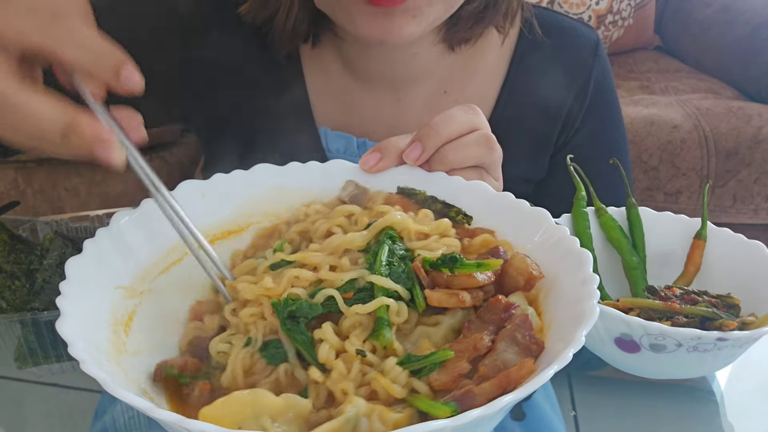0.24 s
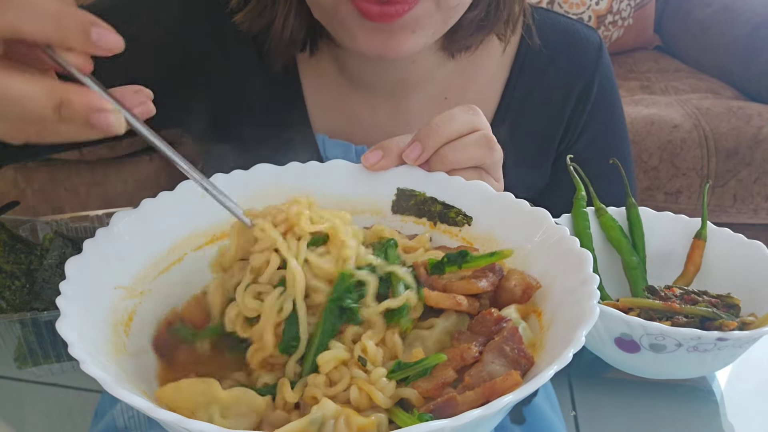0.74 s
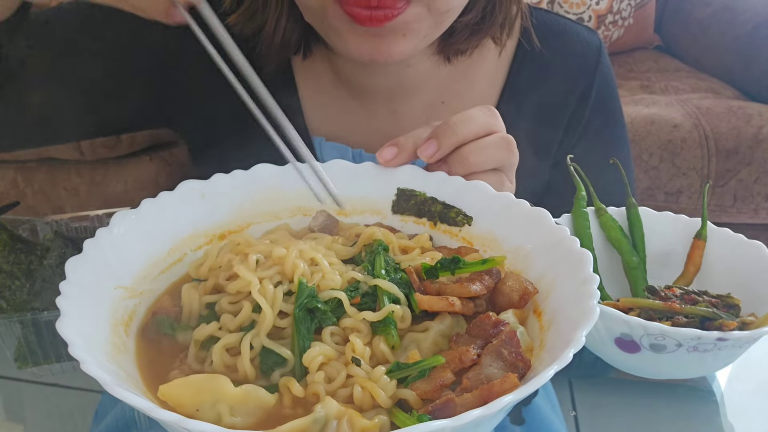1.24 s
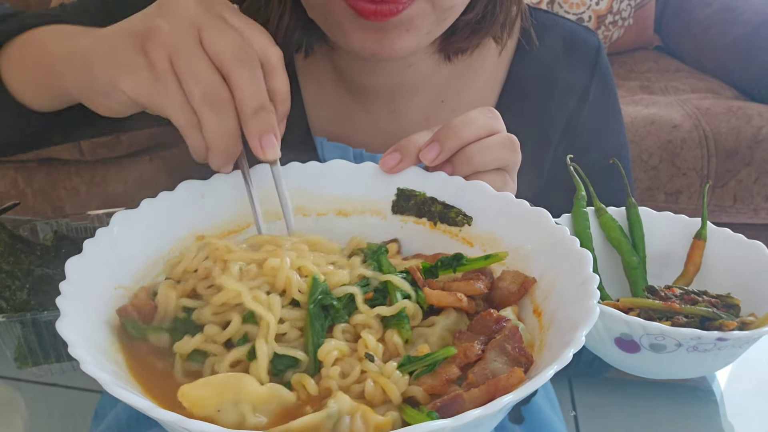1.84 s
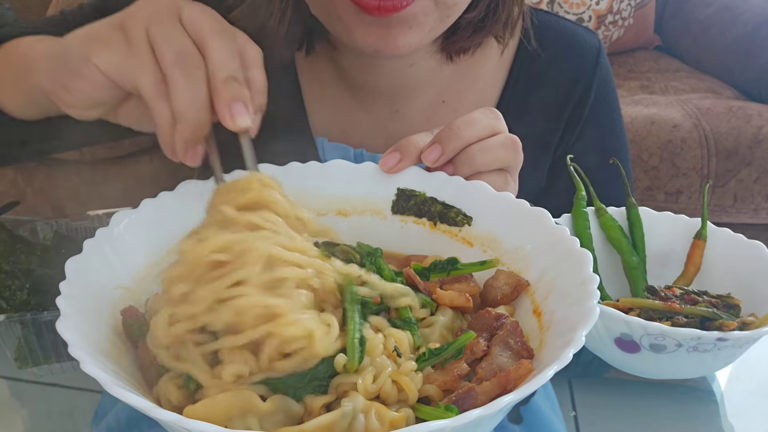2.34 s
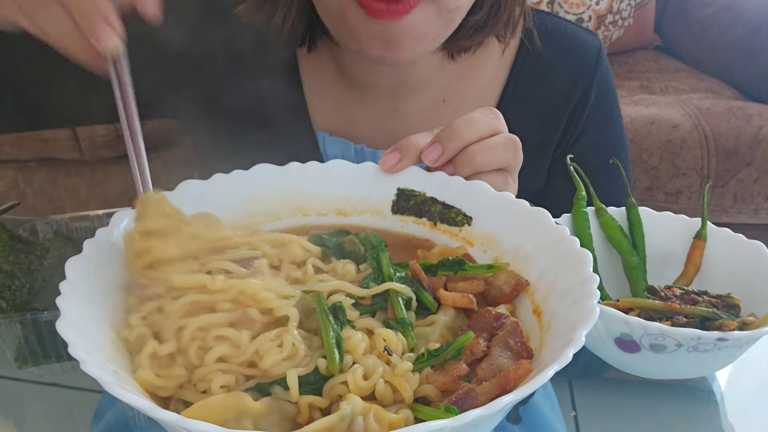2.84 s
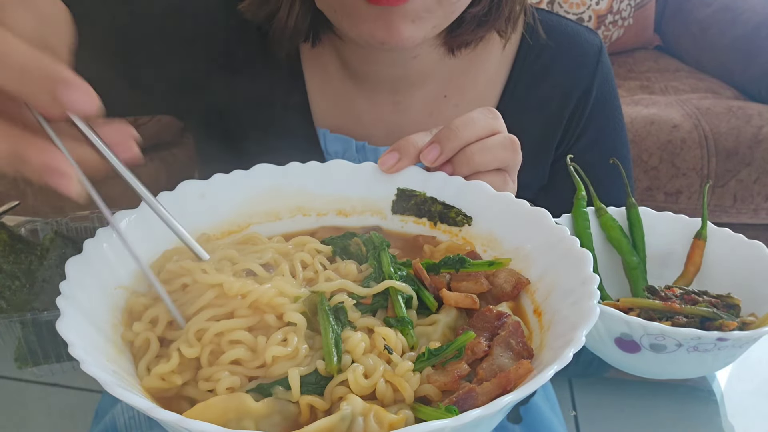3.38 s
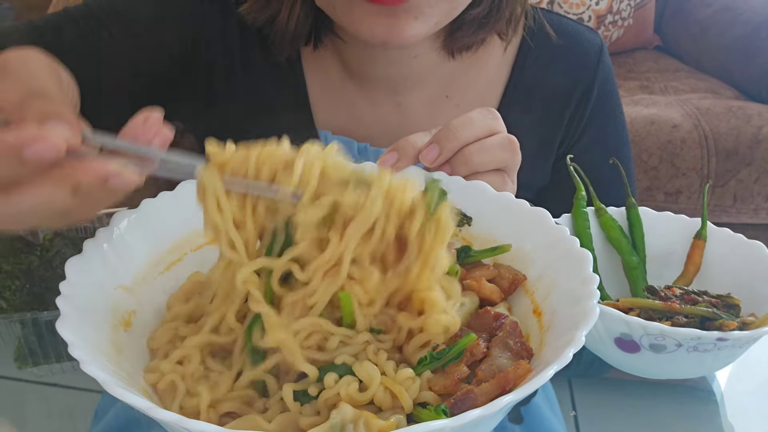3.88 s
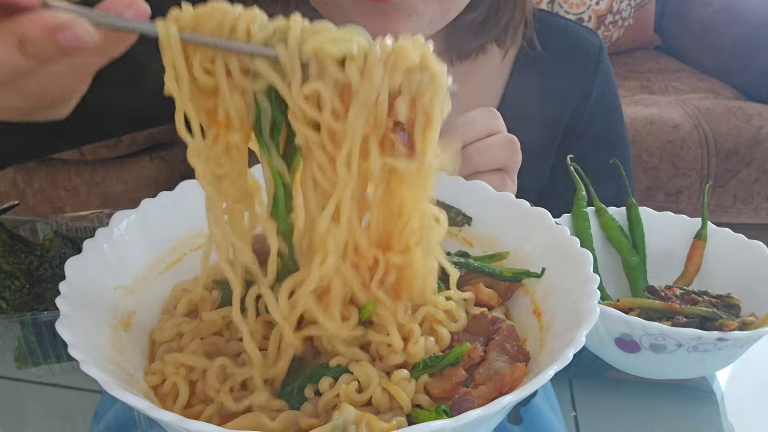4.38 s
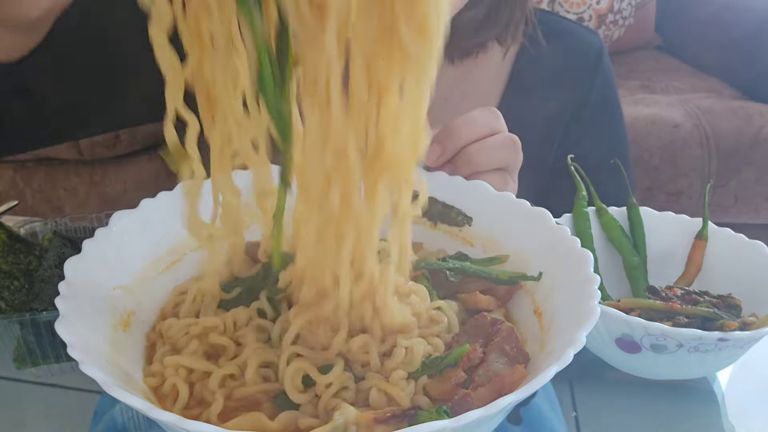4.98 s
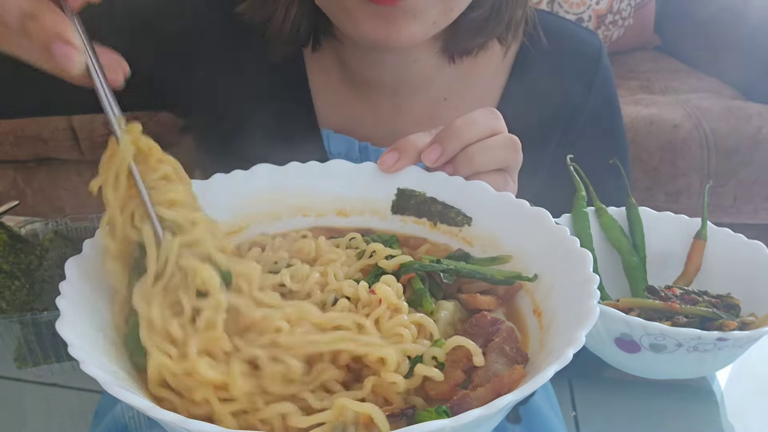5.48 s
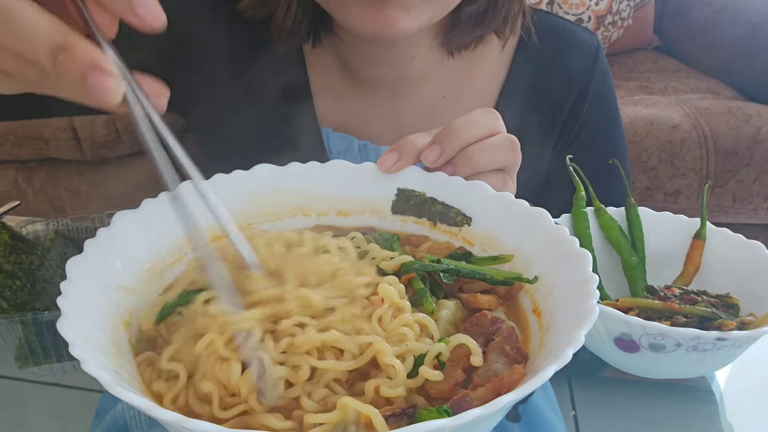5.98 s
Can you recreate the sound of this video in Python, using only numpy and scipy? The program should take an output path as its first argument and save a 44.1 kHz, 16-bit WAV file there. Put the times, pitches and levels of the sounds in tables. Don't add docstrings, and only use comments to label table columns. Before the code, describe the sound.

Steel chopsticks clink and scrape on a glazed bowl while wet noodles crackle and pop softly over a low motor hum and faint hiss.

```python
import sys
import numpy as np
from scipy import signal
from scipy.fft import rfft, irfft, next_fast_len
from scipy.io import wavfile
from scipy.ndimage import uniform_filter1d

SR = 44100
rng = np.random.default_rng(int(sys.argv[2]) if len(sys.argv) > 2 else 0)


def boost(x):
    u = np.asarray(x, float) / 20
    return 10 ** u


def wav_out(sig):
    wavfile.write(sys.argv[1], SR, np.round(np.clip(np.atleast_2d(sig).T, -1, 1) * 32767).astype(np.int16))


N = 274302

# ring_time_share (0-1), crack_db, crack_s, thud_db, slide_top_hz
SPOTS = [(0.63, -3, 0.0097, -11, 5800), (0.59, 3, 0.0044, -16.5, 12000), (0.66, -4, .01, -34, 5700),
         (0.37, 1.5, 0.013, -5.5, 7300), (0.66, -6.5, 0.0053, -19, 9400), (0.65, -7, .01, -28, 9500),
         (0.34, -21, .01, -36, 10400)]


def shape(points, hz):
    p = np.array(points)
    return np.interp(np.log(hz), np.log(p[:, 0]), p[:, 1])


def unit(x):
    return x / np.sqrt(np.mean(x ** 2) + 1e-20)


def convolve(x, response):
    return signal.fftconvolve(np.atleast_2d(x), response, axes=1)[:, :N]


def butter(x, order, hz, kind="low"):
    return signal.sosfilt(signal.butter(order, hz, kind, fs=SR, output="sos"), x)


def add(track, part, at):
    part = part[:, :N - at]
    track[:, at:at + part.shape[1]] += part


def flutter(rate, depth_db):
    count = int(N / SR * 60) + 2
    slow = uniform_filter1d(rng.standard_normal(count), max(1, round(60 / rate)))
    return boost(depth_db * np.interp(np.linspace(0, count - 1, N), np.arange(count), unit(slow)))


def airborne(gain_at):
    # pitch_hz, likeness (0-1)
    likeness = [(60, 0.96), (250, 0.99), (500, 0.5), (800, 0.18), (1200, 0.81), (2000, 0.4), (4000, 0.01),
                (15000, 0)]
    # pitch_hz, left_minus_right_db
    lean_curve = [(60, -1), (110, -2), (200, -2), (380, -2.5), (700, -5.5), (1290, -3.5), (2380, -3),
                  (4400, -2.5), (8120, -6.5), (15000, 16)]
    port_lag_s = 0.00019
    size = next_fast_len(N)
    hz = np.maximum(np.arange(size // 2 + 1) * SR / size, 1)
    mid, side = rfft(rng.standard_normal((2, size))) * gain_at(hz)
    alike = np.clip(shape(likeness, hz), 0, 1)
    lean = boost(shape(lean_curve, hz) / 2)
    shared, own = np.sqrt(1 + alike) * mid, np.sqrt(1 - alike) * side
    left = (shared + own) * lean * np.exp(-2j * np.pi * hz * port_lag_s)
    right = (shared - own) / lean
    pair = irfft(np.array([left, right]), size)[:, :N]
    return pair / np.sqrt(np.mean(pair.mean(axis=0) ** 2))


def room_noise(deep_db, drone_db, hiss_db):
    # pitch_hz, density_db (dB per Hz)
    deep_colour = [(25, -55), (33, -16), (42, -15), (52, -2.5), (64, 6), (80, -2), (100, -1)]
    # pitch_hz, density_db (dB per Hz)
    drone_colour = [(60, -17), (98, -6.5), (125, -7.5), (160, -8.5), (200, -0.5), (255, -1), (320, -4.5),
                    (400, -11), (520, -11), (720, -22), (1100, -12.5), (1450, -23), (1930, -21),
                    (2600, -30)]
    # pitch_hz, density_db (dB per Hz)
    hiss_colour = [(1760, -12.5), (3000, 4), (4380, -3.5), (8140, -9), (10400, -9), (15100, -12),
                   (16000, -15), (16500, -32)]
    # pitch_hz, width_hz, over_drone_db
    hum_lines = [(51.6, 16, -3.5), (95.52, 1.34, -7.5), (261.1, 4.3, -10), (379.6, 3, -15)]
    fall_db_per_octave, top_hz = -39, drone_colour[-1][0]

    def drone_gain(hz):
        fall_db = fall_db_per_octave * np.log2(np.maximum(hz / top_hz, 1))
        return boost(shape(drone_colour, hz) + fall_db) * (hz > 40)

    deep = airborne(lambda hz: boost(shape(deep_colour, hz)) * (hz > 15) * (hz < 130))
    drone = airborne(drone_gain)
    for line_hz, width, line_db in hum_lines:
        drone = drone + boost(line_db) * airborne(lambda hz: 1 / (1 + (2 * (hz - line_hz) / width) ** 2))
    hiss = airborne(lambda hz: boost(shape(hiss_colour, hz)))
    deep = boost(deep_db) * flutter(6, 0.52) * deep
    drone = boost(drone_db) * flutter(12, 0.88) * drone
    return deep + drone + boost(hiss_db) * hiss


def room_tail(x):
    t60_s, tail_db = 0.42, -3.5
    t = np.arange(SR // 2) / SR
    noise = rng.standard_normal((2, len(t))) * np.clip(t / 0.0045, 0, 1)
    dull = signal.lfilter([.4], [1, -.6], noise)
    bright = noise - dull
    response = dull * boost(-60 * t / t60_s) + bright * boost(-60 * t / (.7 * t60_s))
    return boost(tail_db) * convolve(x.mean(axis=0), response / np.sqrt(np.sum(response ** 2) / 2))


def pop(peak_db, hz, pan_db, cycles, glide, snap_db):
    turn = np.arange(160) * hz / SR
    swell = (turn / cycles) * np.exp(1 - turn / cycles)
    wave = swell * np.sin(2 * np.pi * turn * (1 + glide * turn))
    wave[1:4] += boost(snap_db) * np.array([.5, -1, .5])
    return boost(peak_db + np.array([[pan_db / 2], [-pan_db / 2]])) * wave


def clear_pops(gain_db):
    # start_s, peak_db, pitch_hz
    stir_pops = [(.0303, -56, 9600), (.088, -51, 7000), (.1093, -44, 8460), (.132, -44.5, 4360),
                 (.435, -58, 9700), (.541, -51, 15200), (.5498, -48.5, 9300), (.6047, -48.5, 9700),
                 (.6473, -49, 7500), (.6882, -52, 13700), (.7262, -50, 15600), (.791, -45, 5600),
                 (.8591, -50, 9000), (.8802, -50, 4730), (1.0444, -53, 7930), (1.8407, -45.5, 5200),
                 (1.906, -48, 8500), (2.085, -43, 14700), (2.3413, -51, 8500), (2.6424, -52.5, 7750)]
    # start_s, peak_db, pitch_hz
    lift_pops = [(3.645, -46, 11900), (3.661, -42.5, 8160), (3.724, -44, 10600), (3.7369, -40.5, 9500),
                 (3.8152, -47, 11470), (3.832, -39, 8150), (3.876, -44.5, 7350), (3.9343, -45.5, 8250),
                 (4.0067, -40, 13000), (4.0225, -44, 12400), (4.1174, -50, 11750), (4.133, -38, 9670),
                 (4.159, -41, 15600), (4.4557, -46.5, 8500), (4.4896, -37, 8000), (4.673, -37.5, 12800),
                 (4.686, -57, 7650), (5.1666, -43, 7750), (5.2089, -43.5, 9500), (5.224, -41, 5940),
                 (5.239, -44, 8600), (5.271, -34.5, 7800), (5.326, -42, 13700), (5.3607, -42, 12200),
                 (5.379, -47, 10500), (5.511, -40, 14000), (5.7053, -53.5, 8550), (5.724, -47, 10400),
                 (5.7678, -46, 13800), (5.796, -48, 8800)]
    # start_s, peak_db, pitch_hz
    drain_pops = [(2.7868, -49, 2780), (2.8647, -49, 3200), (2.946, -46, 4900), (2.9544, -49, 9000),
                  (3.011, -52, 11000), (3.0177, -50, 3200), (3.043, -43, 5200), (3.1852, -48, 4000),
                  (3.231, -47, 3460), (3.244, -48, 4540), (3.253, -47, 5200), (3.2907, -46.5, 5500),
                  (3.35, -41, 12500), (3.4062, -48, 11100), (3.5095, -46, 4660), (3.525, -47, 5500),
                  (3.5543, -47, 5430), (5.0597, -49.5, 4350), (5.9198, -36.5, 5400), (5.976, -53, 5640)]
    # start_s, peak_db, pitch_hz
    fine_pops = [(2.7684, -58, 6200), (2.8164, -60, 6000), (2.8545, -53, 6500), (2.9894, -53, 5700),
                 (3.0614, -54, 5020), (3.0824, -55, 5800), (3.1765, -56, 8500), (3.2814, -48, 7000),
                 (3.5045, -53, 8500), (3.5084, -50, 14000), (3.5704, -54, 11000), (3.5814, -54, 8500),
                 (3.5854, -50, 12600), (3.588, -54, 6000), (5.0325, -51, 4670), (5.1724, -49, 6500),
                 (5.1955, -54, 6500), (5.239, -48, 5270), (5.304, -46, 8500), (5.369, -48, 4470),
                 (5.4465, -52, 7200), (5.4806, -56, 6800), (5.5344, -56, 7500), (5.557, -55, 7000),
                 (5.7624, -58, 7300), (5.7834, -52, 13000), (5.895, -54, 4500), (5.9284, -53, 12000),
                 (5.958, -51, 10000), (5.9634, -52.5, 5420), (5.972, -45, 13000), (6.0048, -50, 13000),
                 (4.341, -44, 1010), (5.201, -48, 905), (5.8945, -51, 1100), (5.925, -57, 5200)]
    # start_s, peak_db
    ticks = [(0.515, -49), (.887, -52), (.9126, -52), (2.06, -55), (2.1414, -51), (2.1617, -58),
             (2.4658, -53), (3.3555, -44), (3.6037, -51), (3.6824, -56), (3.707, -54), (3.8005, -45),
             (3.827, -46), (3.8535, -51), (3.8915, -49), (3.9343, -43), (3.952, -47), (3.9649, -45),
             (3.9894, -48), (4.0989, -53), (4.1224, -49), (4.167, -50), (4.1873, -48), (4.3183, -53),
             (4.4658, -50), (4.5836, -53), (4.6048, -50), (4.6203, -45), (4.6534, -53), (4.6894, -44),
             (4.7044, -49), (4.8273, -53), (4.9192, -58), (4.975, -51), (5.1496, -49), (5.2633, -52),
             (5.3028, -51), (5.34, -53), (5.4565, -46), (5.4959, -52)]
    tick_rows = [(*row, 13860) for row in ticks]
    kinds = [(stir_pops, 1.28), (lift_pops, 1.28), (drain_pops, 1.65), (fine_pops, 1.3), (tick_rows, 1.28)]
    rows = []
    for pops, cycles in kinds:
        for s, peak_db, hz in pops:
            pan_db = -2.5 + 3 * np.log2(hz / 5000) + 6.5 * rng.standard_normal()
            rows.append([s, peak_db - gain_db[int(s * SR)], hz, pan_db, cycles])
    return rows


def crackle(rustle_db):
    per_s, crackle_db = 650, 7
    draw = rng.random((9000, 5))
    times = np.cumsum(-np.log(1 - draw[:, 0])) / per_s
    rows = []
    for s, (_, size, pitch, side, cycles) in zip(times[times < N / SR], draw):
        moving_db = 2.34 * (rustle_db[int(s * SR)] + 80.5) - 89.0
        level_db = moving_db + crackle_db + min(-3.5 * np.log(1 - size), 6.0)
        low, high = (2960, 8000) if 2.82 < s < 3.33 else (4000, 15200)   # Hz, draining or not
        hz = low * (high / low) ** pitch ** .7
        rows.append([s, level_db, hz, 8 * (side - .3), 0.47 + 2.6 * cycles])
    return rows


def noodles(rustle_db, gain_db):
    out = np.zeros((2, N + 200))
    for s, peak_db, hz, pan_db, cycles in clear_pops(gain_db) + crackle(rustle_db):
        lag = max(0, round(-pan_db * 1e-5 * SR))
        snap_db = 1.5 + 12 * min(np.log2(hz / 8000), 0)
        wave = pop(peak_db, hz, pan_db, cycles, 0.0041, snap_db)
        at = int(s * SR)
        out[0, at + lag:at + lag + 160] += wave[0]
        out[1, at:at + 160] += wave[1]
    return out[:, :N]


def contact_noise(spot, t):
    # pitch_hz, t60_s, level_db
    thud_modes = [(241.3, 0.14, 9.5), (372, 0.18, 2)]
    shimmer_db = [-16, -18, -26, -28, -16, -26, -26]
    _, crack_db, crack_s, thud_db, _ = SPOTS[spot]
    crack_fall = boost(crack_db - 60 * t / crack_s) + boost(crack_db + 4.5 - 60 * t / 0.022)
    crack = rng.standard_normal((2, len(t))) * crack_fall
    shimmer = rng.standard_normal((2, len(t))) * boost(shimmer_db[spot] - 60 * t / 0.2)
    crack = crack + butter(shimmer, 2, 8500, "high")
    thud = sum(boost(thud_db + db - 60 * t / t60_s) * np.sin(2 * np.pi * low_hz * t)
               for low_hz, t60_s, db in thud_modes)
    return crack, thud


def ringing(spot):
    # pitch_hz, t60_s
    bowl = [(452, .15), (1095, .055), (1968, .095), (2288, .09), (2643, .11), (2915, .08), (3340, .09),
            (3525, .06), (3755, .12), (4700, .07), (4950, .075), (5385, .07), (5560, .07), (6140, .05)]
    # pitch_hz, t60_s
    sticks = [(6288, .075), (6810, .05), (7010, .045), (7420, .06), (7740, .125), (7980, .055), (9350, .05),
              (10420, .035), (10860, .05), (11670, .035), (12640, .045), (13690, .03), (14580, .045),
              (15280, .04)]
    # pitch_hz, t60_s
    glass = [(930, .12), (1420, .09), (1620, .09), (2130, .08), (3850, .07), (4180, .06), (5100, .06),
             (8330, .06)]
    bowl_reach = [(-15, -4, -3.5, -0.5, -28, -24, -4.5, -12, -9, -6, -7, -3.5, -5.5, -41),
                  (-15.5, -31.5, -8.5, -9.5, -13.5, -43, -30, -45.5, -19, -31.5, -16.5, -19.5, -32, -11.5),
                  (-16, -18, -2, -10, -20, -15, -3, -3, -12, -7, -19, -16, -20, -21),
                  (-42, -4, -5, 0, -37, -30, -8, -10, -5, -14, 4.5, -8, -0.5, 0),
                  (-13, -11, -16.5, -40, -18, -20, -46, -31, -11, -38, 3.5, -28, -36, -27),
                  (-19, -15, -12, -4, -18, -25, -22, 3, -8, -16, -18, -10, -20, -6),
                  (-21, -4, -0.5, 3.5, -12, -22, -15, 0, -12, -20, -13, -13, -20, -25)]
    stick_reach = [(-13, -5, 5, 2, -12, 2, -23, -33, -27, -43, -1, -4, -1, -17),
                   (3.5, -34, -23, -30.5, 4, -1.5, -1, -19, 0, -6, -5, 11, -6.5, -8),
                   (-26, -11, -21, -15, -20, -20, -29, -24, -24, -29, -21, -13, -25, -31),
                   (-16, 5, -3, -15.5, -1, 3, -3, 3, -11, -12, 0, -12, -8, -10),
                   (6, -1, -12, -15, -23, -5.5, -10, -6, 0, 3.5, -10, -1, -5.5, -9),
                   (-18, -13, -21, 0.5, -11, -20, -29, -24, -24, -29, -21, -18, -25, -31),
                   (-26, -16, -21, -12, -17, -20, -29, -24, -24, -29, -21, -18, -25, -31)]
    glass_reach = [(-24, -28, -27, -3.5, -5.5, -20, -22, -12), (-16, -27.5, -20.5, -13, -9, -28, -24.5, 1),
                   (-30, -30, -30, -11, -17, -12, -23, -25), (-15, -20, -11, -2, -1, -22, -17, -1),
                   (-23, -22, -20, -30, -13, -34, -25, -4), (-28, -24, -28, -18, -1, -8, -18, -20),
                   (-23, -26, -28, -2, -12, -17, -6, -25)]
    rubbed = [0, 1, 3, 4]
    rub_bowl = [(1, -8, 0.5, -1, 5, 11, -4, -2, -2, -2, 0, 1, -3, 4),
                (0, 1, 0, -11, 5.1, 4, -3, -3, 1, -3.5, 3, 12, 20.5, 15),
                (-3, 0, 5, 1, 6, 6, 1, 7, -3, 3, -4.5, -5, 1, -4),
                (-4, -6, 6, 6, 16, -3, -3, -3, 8, -3, -19, -3, -6, -3)]
    rub_stick = [(-8, -10, -10, -9, 2.5, -3, 6, 5, 6, 6, 4, -4, -6, 3),
                 (-2.5, 6, 2, 8, -1, 9, -6, 3, 1.5, 4, -8, -11, 1, 3),
                 (3, -5, 1, 3, 3, 1, 6, 7, 3, 3, -3, 6, 3, 6),
                 (-9, -3, -3, 6, 5, 3, 3, -3, -3, -6, -3, -3, 6, 6)]
    # left_minus_right_db at 5 kHz, tilt_db per octave, swing_db
    aim = [(-3.5, 1.5, 7), (-1, 3, 7.5), (-1, -2, 10), (1, 4.5, 5.5), (-3.5, 3, 5), (-3, -2, 4), (-4, 1, 8)]
    # lag_ms, phase_rad
    table_echo = [(.73, -3.03), (.916, -2.51), (1.166, 2.47), (.4, -3.1), (.094, .41), (1.166, 2.47),
                  (1.166, 2.47)]
    twin = [.35, .25, .3, .2, .08, .3, .3]
    t = np.arange(SR // 4) / SR
    modes = np.array([*bowl, *sticks, *glass])
    hz = modes[:, :1]
    t60 = modes[:, 1:2] * SPOTS[spot][0] * (hz / 5000) ** -.25
    level_db = np.array([*bowl_reach[spot], *stick_reach[spot], *glass_reach[spot]])[:, None]
    lean_db, tilt_db, swing_db = aim[spot]
    lag_ms, echo_phase = table_echo[spot]
    lobe_db = lean_db + tilt_db * np.log2(hz / 5000)
    lobe_db = lobe_db + swing_db * np.sin(2 * np.pi * hz * lag_ms / 1000 + echo_phase)
    phase = rng.uniform(0, 2 * np.pi, (2, len(modes), 1))
    turn = 0.7 * rng.choice([-1, 1], hz.shape)
    twin_hz = hz * (1 + 0.028 * rng.uniform(-0.98, 1, hz.shape))
    second = twin[spot] * np.sin(2 * np.pi * twin_hz * t + phase[1])
    sides = []
    for sign in (1, -1):
        first = np.sin(2 * np.pi * hz * t + phase[0] + sign * turn)
        sides.append(boost(level_db + sign * lobe_db / 2 - 60 * t / t60) * (first + second))
    crack, thud = contact_noise(spot, t)
    rise = np.clip(t / .0015, 0, 1)
    rest = rise * butter(crack, 2, 700, "high") + thud
    more_db = np.zeros(hz.shape)
    if spot in rubbed:
        row = rubbed.index(spot)
        more_db[:len(bowl) + len(sticks), 0] = [*rub_bowl[row], *rub_stick[row]]
    struck = rise * np.sum(sides, axis=1) + rest
    pressed = rise * np.sum(sides * boost(more_db), axis=1) + rest
    return struck, pressed


def pressure(spot):
    # firmest_s, pressure_db, build_up_s, easing_db_per_s
    slides = [
        [(0.25, -48, 0.013, 600), (.275, -59.5, .02, 100), (.308, -56, .005, 250), (.335, -66.5, .02, 126)],
        [(1.348, -55, 0.04, 700), (1.38, -65.5, .03, 56)],
        [(1.565, -57, 0.033, 100), (1.585, -52, 0.062, 300)],
        [(1.518, -59, 0.055, 700), (3.44, -57, 0.017, 250), (3.488, -63, .03, 900)],
        [(6.049, -51.5, 0.017, 129.5)],
        [(1.615, -56, 0.02, 100)],
        [(1.65, -56, .03, 300), (1.675, -55, 0.014, 300)],
    ]
    contact_s = [0.27, 0.28, 0.012, .12, .3, .025, 0.024]
    build_db, lift_off_db_per_s = 27, 400.0
    t, rows = np.arange(N) / SR, slides[spot]
    pushes = [db - np.where(t < s, build_db * (s - t) / build, ease * (t - s)) for s, db, build, ease in rows]
    lifted = np.maximum(t - rows[-1][0] - contact_s[spot], 0)
    push_db = np.maximum(np.max(pushes, axis=0) - lift_off_db_per_s * lifted, -200)
    return np.where(t > rows[0][0] - rows[0][2], push_db, -200)


def knocking(spot, knocks, struck, pressed):
    soft_below_db = [-45, -45, -30, -45, -30, -30, -30]
    soft_hz = [7000, 7000, 4500, 7000, 2500, 6000, 4500]
    out, force = np.zeros((2, N)), np.zeros((2, N))
    for (s, force_db, chatter), late in zip(knocks, rng.random((len(knocks), 3))):
        force[int(force_db < soft_below_db[spot]), int(s * SR)] += boost(force_db)
        force[1, ((s + chatter * late) * SR).astype(int)] -= boost(force_db - 12.5)
    first, last = int(knocks[0][0] * SR), int((knocks[-1][0] + .05) * SR)
    soft = signal.lfilter(*signal.butter(1, soft_hz[spot], fs=SR), force[1, first:last] + 1e-18)
    add(out, convolve(force[0, first:last], struck) + convolve(soft, pressed), first)
    return out


def sliding(spot, pressed):
    held_t60_s = [0.034, 0.058, 0.08, 0.033, 0.041, 0.085, 0.045]
    grit_db = [8.5, 8.5, -10, -1, 9, 0, -2]
    grit_hz = [1800, 5200, 3200, 3000, 7500, 3200, 3200]
    turn_hz = [2900, 4300, 7000]
    turn_db = [2.0, 3.0, 3.0, 2.0]
    out, press_db = np.zeros((2, N)), pressure(spot)
    catches = rng.standard_normal(N) * (rng.random(N) < 2500 / SR) * flutter(40, 2.1)
    rub = butter(catches * boost(press_db), 2, [900, min(SPOTS[spot][4], 18000)], "band")
    t = np.arange(pressed.shape[1] // 2) / SR
    held = pressed[:, :len(t)] * boost(-60 * t / held_t60_s[spot])
    rasp = boost(grit_db[spot] - 60 * t / 0.011) * rng.standard_normal(held.shape)
    rasp = butter(rasp, 2, grit_hz[spot], "high")
    below = [0] + [butter(held, 2, hz) for hz in turn_hz] + [held + rasp]
    touch = np.flatnonzero(press_db > -150)
    for low, high, swing_db in zip(below, below[1:], turn_db):
        moving = rub * flutter(35, swing_db)
        add(out, convolve(moving[touch[0]:touch[-1]], high - low), touch[0])
    return out


def chopsticks():
    # start_s, force_db, chatter_s
    knocks = [
        [(.2375, -32.5, 0.0031), (.3047, -46, 0.0032), (.335, -48, 0.0047), (.365, -55, 0.0042)],
        [(1.3155, -31.5, 0.00098), (1.3275, -34.5, 0.0045), (1.341, -44.5, 0.0055), (1.383, -52, 0.0057),
         (1.442, -60, 0.0029), (1.5014, -62, 0.0036), (1.51, -49, 0.0041), (1.738, -67, .002),
         (1.8173, -60.5, 0.0054)],
        [(1.5633, -41.5, 0.0032)],
        [(1.4496, -42.5, 0.002), (3.4236, -36, 0.0021), (3.479, -55, 0.0049)],
        [(6.0332, -43.5, 0.00065), (6.0352, -22.5, 0.002), (6.0372, -29.5, 0.0014), (6.093, -44, 0.004),
         (6.12, -45.5, 0.0096)],
        [(1.607, -41.5, 0.0027), (1.62, -52, 0.0047)],
        [(1.645, -47, .003), (1.6696, -48, 0.0036)],
    ]
    wall_db = [-5, -5, 0, -5, -7.5, -2, -4]
    out, walls = np.zeros((2, N)), np.zeros((2, N))
    for spot, spot_knocks in enumerate(knocks):
        struck, pressed = ringing(spot)
        here = knocking(spot, spot_knocks, struck, pressed) + sliding(spot, pressed)
        out += here
        walls += boost(wall_db[spot]) * here
    return out, walls


def recorder_gain():
    step_s, step_db = 2.757, 5.5
    return step_db * np.clip((np.arange(N) / SR - step_s) / 0.0056, 0, 1)


def scene():
    # time_s, rustle_db
    stir = [(0, -75), (.2, -79.5), (.5, -79), (.9, -76.5), (1.3, -82.5), (1.8, -76.5), (2.1, -76.5),
            (2.4, -79), (3, -78.5), (3.2, -80), (3.5, -75.5), (3.9, -76.5), (4.3, -78.5), (4.7, -77),
            (5.05, -79), (5.2, -75), (5.5, -74.5), (5.6, -80.5)]
    # time_s, level_db
    rumble = [(0, -53), (.5, -56), (1.5, -55), (2.4, -50.5), (2.72, -54), (2.8, -55), (3.4, -55),
              (4.2, -55.5), (4.5, -52), (5, -53.5), (5.9, -54.5), (6.22, -57)]
    t, gain_db = np.arange(N) / SR, recorder_gain()
    rustle_db = np.interp(t, *np.transpose(stir))
    rumble_db = np.interp(t, *np.transpose(rumble))
    hard, sent = np.array(chopsticks()) / boost(gain_db)
    wet = noodles(rustle_db, gain_db)
    walls = room_tail(sent + boost(-6.0) * wet)
    return hard + wet + walls + room_noise(rumble_db, -49.5, rustle_db)


def band_limit(x):
    return signal.sosfilt(signal.butter(12, 17000, fs=SR, output="sos"), x)


def record(dry):
    # start_s, height (full scale 1)
    jumps = [
        (2.7428, -0.0055),
        (2.745, -0.0021),
        (2.747, 0.0022),
        (2.759, 0.022),
    ]
    jolts = np.zeros(N)
    for s, height in jumps:
        jolts[int(s * SR)] = height
    wired = dry * boost(recorder_gain()) + signal.lfilter([1], [1, -.97], jolts)
    top_cut = signal.cheby2(12, 34, 16050, fs=SR, output="sos")
    return band_limit(signal.sosfilt(top_cut, wired))


dry = scene()
out = record(dry)
wav_out(out)
```